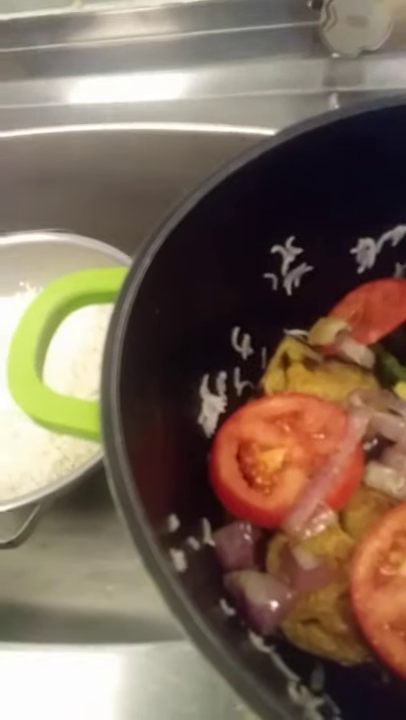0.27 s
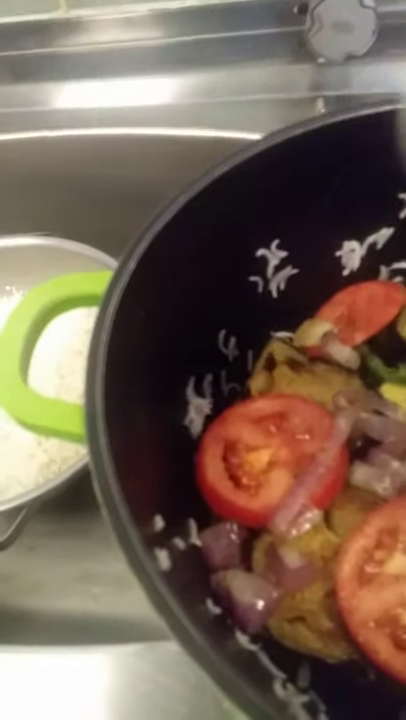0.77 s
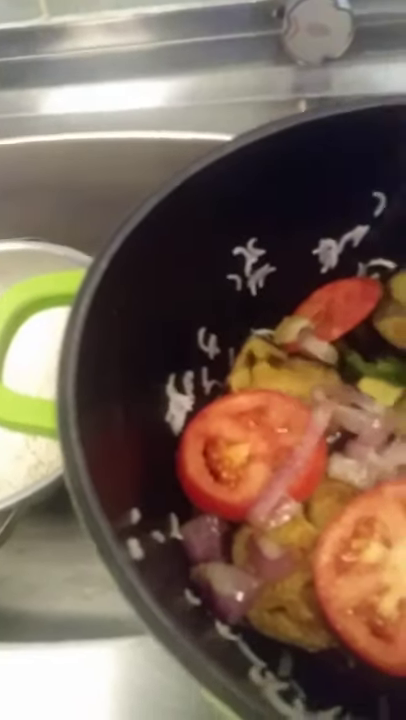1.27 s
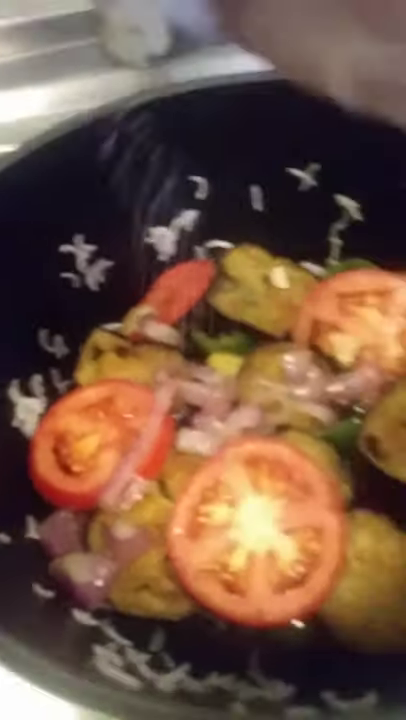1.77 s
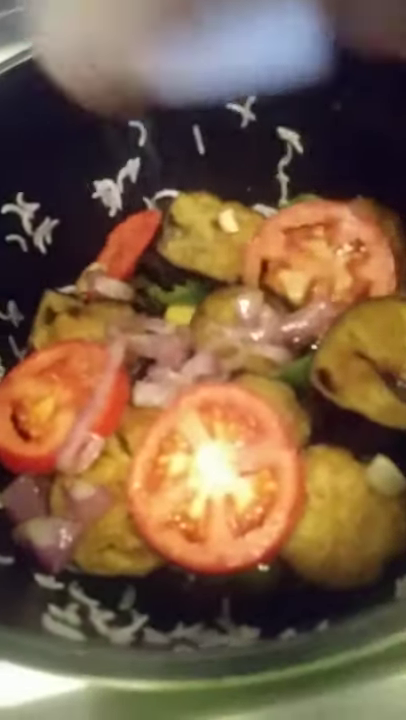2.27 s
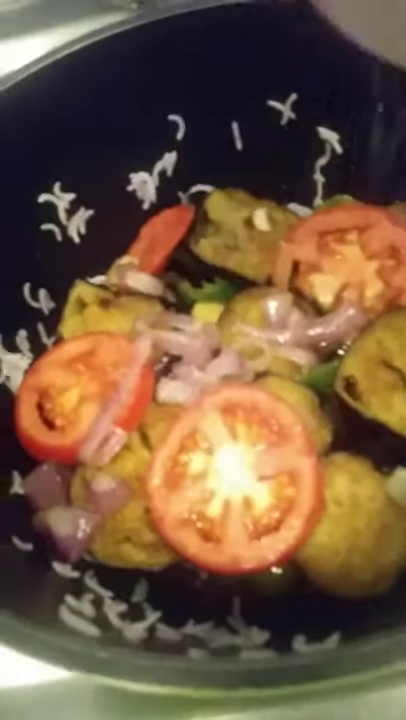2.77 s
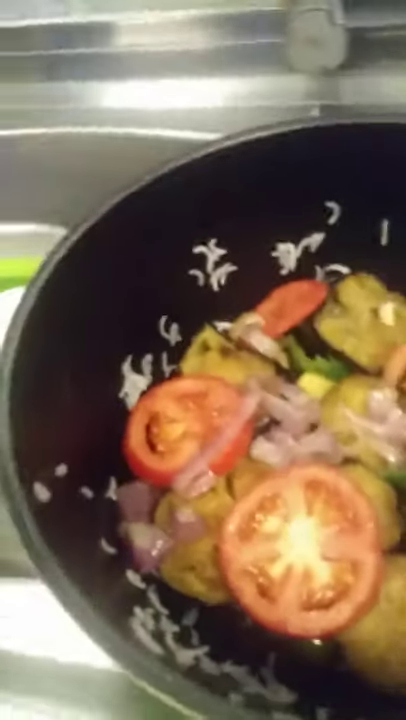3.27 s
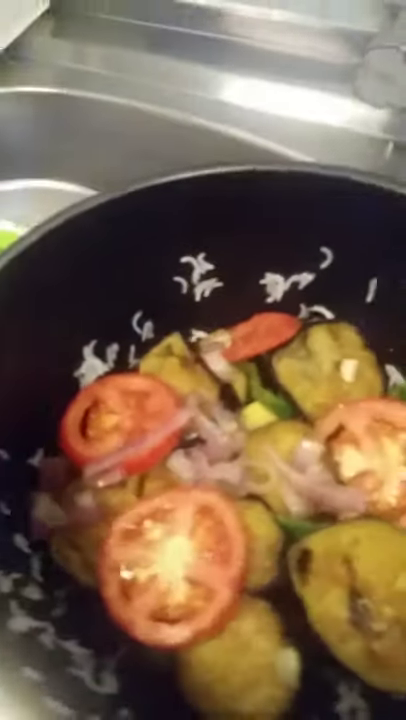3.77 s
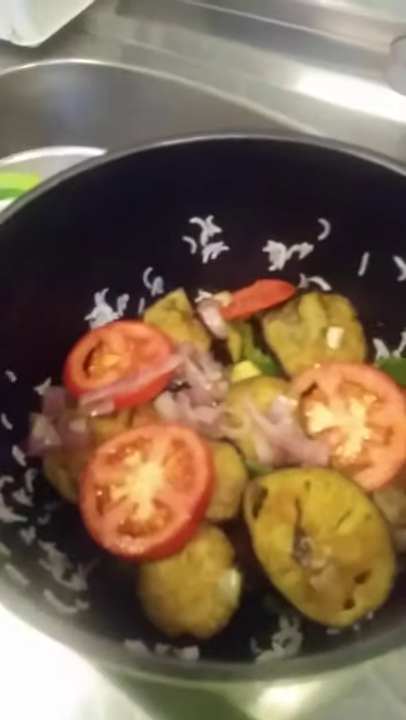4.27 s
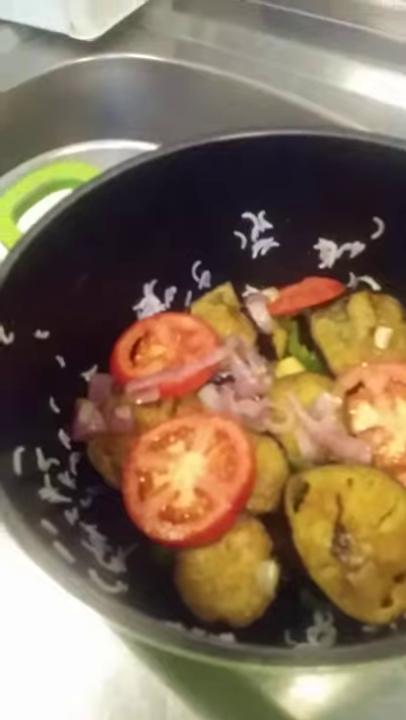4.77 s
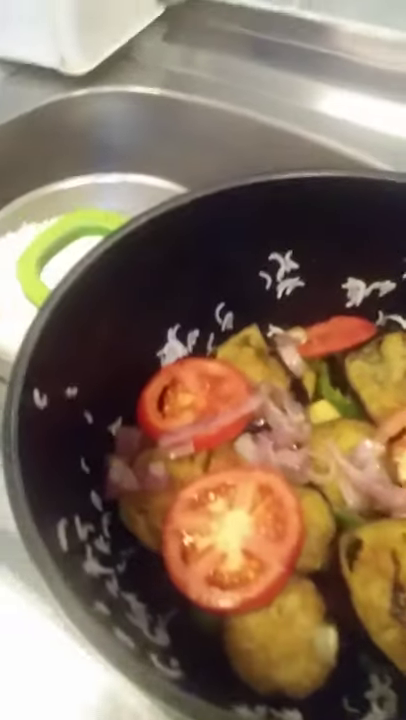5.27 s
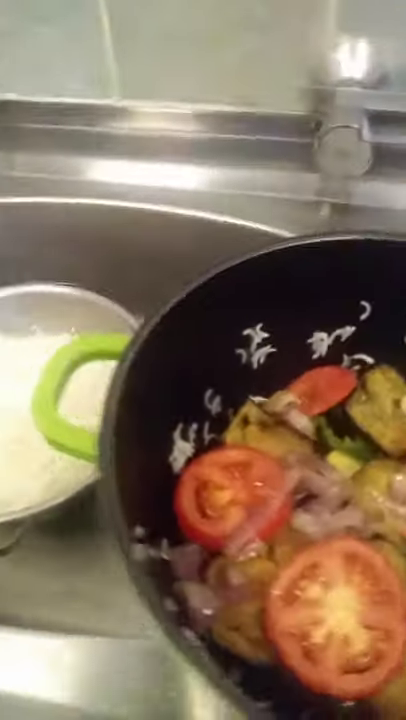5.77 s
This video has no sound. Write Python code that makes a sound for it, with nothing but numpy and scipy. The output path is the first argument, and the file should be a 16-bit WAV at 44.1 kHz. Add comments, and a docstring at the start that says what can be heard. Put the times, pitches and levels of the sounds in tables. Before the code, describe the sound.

Dry salt grains rattle against a shaker cap around five strokes a second, strongest after the first second, with short tiled-room echo and steady phone hiss. After nearly three seconds the shaking ends; tiny clicks and dull bumps remain amid choppy near-silent lulls. Near the end a sudden loud clang with a low thump jangles through the room, over a growing hollow, wavering rush.

```python
"""A salt shaker is shaken about five times a second over a pot of vegetables in a kitchen sink, close to a phone.
Each stroke is a bouncing clump of salt, a swarm of random grains ringing the cap, and a landing tick and hollow pop.
Small knocks (clicks and damped modes) and soft rubs (filtered noise) surround it, over steady hiss and a faint hum.
A hollow rush of resonant noise and wavering tones sets in, then a sudden crash of reflections and metal modes
fills the tiled room and the rush swells. In lulls everything but crash, rush and a faint murk sinks and flutters."""
import sys
import numpy as np
from scipy import signal
from scipy.fft import rfft, irfft
from scipy.io import wavfile
from scipy.ndimage import uniform_filter1d

SR = 44100
rng = np.random.default_rng(int(sys.argv[2]) if len(sys.argv) > 2 else 0)


def transcribe(signal):
    """Save signal, clipped to [-1, 1], as a 16-bit WAV file at the path in sys.argv[1]."""
    frames = np.atleast_2d(signal).T
    limited = np.clip(frames, -1, 1)
    pcm = np.round(limited * 32767).astype(np.int16)
    wavfile.write(sys.argv[1], SR, pcm)


N = 264996
T = np.arange(N) / SR

# colour of salt on the shaker wall: (frequency [Hz], level [dB])
SALT_COLOUR = [(40, -40), (170, -29), (500, -4), (720, -25.5), (950, -26), (1400, -3), (2000, -10),
               (2700, 3.5), (3400, 0.5), (4200, 2.5), (5200, -0.5), (5800, -10.5), (7000, -11), (8000, -30),
               (13000, -41), (16000, -51)]
# colour of the crash: (frequency [Hz], level [dB])
CRASH_COLOUR = [(60, -34), (113, -2), (190, -10.5), (274, -5.5), (529, -5), (834, -3.5), (1120, -8),
                (2170, -9.5), (2800, -4.5), (4300, -3), (8500, -17), (12200, -22.5), (13200, -28),
                (15000, -20.5)]
# how long each band of the crash rings: (frequency [Hz], t60 [s])
CRASH_DECAY = [(100, 0.79), (400, 0.81), (1400, 0.82), (3000, 0.75), (5500, 0.61), (8000, 0.67),
               (12000, 0.32), (16000, 0.42)]
CRASH_LEVEL_S = 0.067  # the wash and jangle of the crash stay at a level this long before they die away
FIRM_DB = -40  # swarm level of a firm stroke


def undb(db):
    """Decibels to gain."""
    return 10 ** (np.asarray(db) / 20)


def unit(x):
    """Scale to rms 1."""
    return x / np.sqrt(np.mean(x ** 2))


def lookup(points, hz):
    """Read a table on a log-frequency axis."""
    f, v = np.transpose(points)
    return np.interp(np.log(hz + 1), np.log(f), v)


def response(points, size=2048):
    """Causal (minimum-phase) impulse response of unit energy with the given colour."""
    freqs = np.arange(size // 2 + 1) * SR / size
    cepstrum = irfft(np.log(undb(lookup(points, freqs))))
    # fold the cepstrum forward in time
    cepstrum[1:size // 2] *= 2
    cepstrum[size // 2 + 1:] = 0
    h = irfft(np.exp(rfft(cepstrum)))
    return h / np.linalg.norm(h)


def through(x, h):
    """Pass a sound through an impulse response."""
    return signal.fftconvolve(x, h)[:len(x)]


def butter(x, order, hz, kind):
    """Butterworth filter, "low" or "high" pass."""
    return signal.sosfilt(signal.butter(order, hz, kind, fs=SR, output="sos"), x)


def decay(size, t60):
    """Exponential fade of 60 dB in t60 seconds."""
    return np.exp(-np.log(1000) * T[:size] / t60)


def level_then_fade(size, level_s, t60):
    """A gain that stays level, then falls 60 dB in t60 seconds."""
    return undb(-60 * np.maximum(T[:size] - level_s, 0) / t60)


def ring(hz, t60, size=8192):
    """One struck mode: a sine that dies away exponentially."""
    return np.sin(2 * np.pi * hz * T[:size]) * decay(size, t60)


def glide(hz):
    """Sine whose frequency follows a curve."""
    return np.sin(2 * np.pi * np.cumsum(hz) / SR)


def resonate(modes):
    """Noise in narrow resonances, rows (frequency [Hz], width [Hz], level [dB])."""
    out = 0
    for hz, width, db in modes:
        t60 = np.log(1000) / np.pi / width
        out = out + undb(db) * unit(through(rng.standard_normal(N), ring(hz, t60, size=16384)))
    return out


def walk(rate):
    """Random wander of rms 1: steps at the given rate [Hz], smoothed twice."""
    k = int(SR / rate)
    steps = np.repeat(rng.standard_normal(N // k + 1), k)
    return unit(uniform_filter1d(uniform_filter1d(steps, k), k)[:N])


def diffuse(band_decay, level_s, size=65536, count=16):
    """Dense reflections: noise that stays level for level_s, then dies in each band at its own rate."""
    noise, out = rfft(rng.standard_normal(size)), 0
    centres = np.geomspace(60, SR / 2, count)
    freqs = np.arange(len(noise)) * SR / size
    for hz, share in zip(centres, np.eye(count)):
        band = irfft(noise * np.interp(freqs, centres, share))
        out = out + band * level_then_fade(size, level_s, lookup(band_decay, hz))
    return out


def add(out, s, x):
    """Mix a sound in at a time."""
    i = int(round(s * SR))
    x, i = x[max(-i, 0):], max(i, 0)
    out[i:i + len(x)] += x[:max(N - i, 0)]


def shaker(low_hz=120):
    """On each stroke a clump hits and bounces, a swarm of grains rattles and the bulk lands with a tick and a pop."""
    # strokes: (first clump [s], its peak [dB], delay of the swarm [s], swarm level [dB],
    #           pop level before its soft onset [dB])
    strokes = [(.005, -31, .016, -44, -48), (.1905, -43, .021, -49, -45), (.3643, -39, .021, -49.5, -56),
               (.5601, -41, .033, -46.5, -48), (.7736, -34, .015, -38.5, -42),
               (.9342, -24.5, .025, -34.5, -35.5), (1.1461, -25.5, .024, -34.5, -36),
               (1.337, -30.5, .033, -38, -36), (1.54, -23, .003, -42, -37), (1.7344, -36, .03, -48, -56),
               (1.957, -46, .032, -47.5, -56), (2.181, -45, .019, -46, -53), (2.37, -42, .012, -49, -54),
               (2.5945, -33.5, .014, -45, -43), (2.7606, -34, .023, -40, -42)]
    bounce_s, bounce_db = .0085, -3
    pop_lead_s = .002  # the pop starts just ahead of the landing tick
    tick_db, tick_growth = -31, 1.5  # peak on a firm stroke; dB per dB of extra force
    out = np.zeros(N)
    for s, clump_db, delay, swarm_db, pop_db in strokes:
        landing_s = s + delay
        add(out, s, clump(clump_db))
        add(out, s + bounce_s, clump(clump_db + bounce_db))
        add(out, *swarm(landing_s, swarm_db))
        add(out, landing_s, clump(tick_db + tick_growth * (swarm_db - FIRM_DB)))
        add(out, landing_s - pop_lead_s, pop(pop_db))
    return butter(out, 1, low_hz, "high")


def clump(db, t60=.015, size=12000):
    """A clump of salt ticks against the cap: a short noise burst that rings it."""
    push = rng.standard_normal(size) * decay(size, t60)
    tick = cap(push, low_db=-15.5, high_db=0, high_hz=4590, body_db=-18.5)
    return undb(db) * tick / abs(tick).max()


def swarm(s, db, grain_rate=2400, grain_spread_db=3.0, rise=1.38, fall=1.27, size=12000):
    """Loose grains thicken towards a moment and thin out again about as quickly: (start time, sound)."""
    t = T[:size] - T[size // 2]
    half = max(.02 + .0007 * (FIRM_DB - db), .005)  # seconds; softer strokes spread out
    flow = 1 / np.cosh(np.where(t < 0, rise, fall) * t / half)
    # sparse impacts of random sign and size
    grains = (rng.random(size) < grain_rate / SR) * rng.choice([-1, 1], size)
    grains = grains * undb(grain_spread_db * np.minimum(rng.exponential(size=size), 4))
    force_db = db - FIRM_DB
    body_db = -13.5 + 1.3 * force_db  # harder strokes ring the body of the cap
    high_db = -3 + .45 * force_db  # and bring out its high ring
    # later swarms ring the cap higher, and its low mode more freely
    low_db = -11 + 4.5 * s
    high_hz = 4520 + 190 * s
    rattle = cap(grains * flow, low_db, high_db, high_hz, body_db)
    return s + t[0], undb(db) * unit(rattle) * np.sqrt(np.mean(flow ** 2))


def cap(push, low_db, high_db, high_hz, body_db, patchy_db=4.0, count=40):
    """Impacts ring the shaker wall, a little differently as the salt shifts, and three modes of its cap."""
    freqs = np.geomspace(150, 16000, count)
    patchy = lookup(SALT_COLOUR, freqs) + patchy_db * rng.standard_normal(count)
    out = unit(through(push, response(np.column_stack([freqs, patchy]))))
    scattered_hz = high_hz * (1 + .02 * rng.standard_normal())  # wanders from hit to hit
    for hz, t60, db in [(1400, .014, body_db), (2760, .016, low_db), (scattered_hz, .016, high_db)]:
        out = out + undb(db) * unit(through(push, ring(hz, t60)))
    return out


def pop(db, t60=.063, size=12000):
    """The bulk of the salt lands and pops the air inside: a short damped tone."""
    scatter = 1 + .02 * rng.standard_normal()
    sinking = 0.917 + 0.14 * np.exp(-T[:size] / 0.0087)  # as the salt settles
    tone = glide(505 * scatter * sinking) * decay(size, t60)
    return undb(db) * tone * (1 - np.exp(-T[:size] / 0.0029))


def knocks(scatter_db=-20, scatter_t60=0.03):
    """A click, a little scatter off the sink and one damped mode for each touch; soft contacts lose their treble."""
    # small knocks of handling: (time [s], mode level at onset [dB], pitch [Hz], t60 [s],
    #                            click level before its treble cut [dB], click top [Hz])
    touches = [(.489, -44, 1000, .009, -30, 4000), (2.714, -38, 890, .006, -37.5, 4000),
               (3.205, -40.5, 212, .024, -54, 3000), (3.661, -37, 545, .007, -41, 1530),
               (3.696, -51, 600, .0065, -34, 6950), (4.1049, -38.5, 4170, .016, -33, 6040),
               (4.108, -49, 3600, .03, -37, 5000), (4.7397, -23.5, 203, .011, -52, 3980),
               (4.7493, -40, 400, .0014, -24, 15000), (5.597, -56, 444, .041, -41, 4500),
               (5.988, -31.5, 560, .018, -23.5, 9100), (5.992, -30.5, 572, .037, -36, 5000)]
    # colour of a click: (frequency [Hz], level [dB])
    click_colour = [(100, -13), (1000, -3.5), (4500, -2), (7000, -11), (9000, -16), (16000, -35)]
    out, click = np.zeros(N), response(click_colour)
    for s, db, hz, t60, click_db, top_hz in touches:
        scatter = rng.standard_normal(len(click)) * decay(len(click), scatter_t60)
        snap = click / abs(click).max() + undb(scatter_db) * through(scatter, response(SALT_COLOUR))
        add(out, s, undb(db) * ring(hz, t60))
        add(out, s, undb(click_db) * butter(snap, 3, top_hz, "low"))
    return out


def rustle(tone_db=-4, tone_t60=.08):
    """Soft rubs as the hand moves over the pot: dull noise with one hollow resonance."""
    # rubs: (time [s], half length [s], level of the dull noise [dB], hollow tone [Hz])
    rubs = [(0.913, 0.014, -64, 785), (1.796, 0.069, -56, 743), (1.985, 0.056, -55, 757)]
    colour = [(60, -9), (130, 2.5), (320, -3), (550, -7), (750, -1.5), (900, -13), (3000, -36)]
    dull = through(rng.standard_normal(N), response(colour))
    out = 0
    for s, half, db, hz in rubs:
        hollow = undb(tone_db) * unit(through(rng.standard_normal(N), ring(hz, tone_t60)))
        out = out + undb(db) * (dull + hollow) * np.exp(-((T - s) / half) ** 2)
    return out


def crash(noise_db=-25.5, jangle_db=-30.5, ring_db=-30.5, boom_db=-33.5, thump_db=-25, clatter_db=1.2, low_hz=80):
    """A hard blow heard mostly by its uneven reflections, with ringing modes, a thump and a beating boom."""
    # ringing modes: (frequency [Hz], level relative to ring_db [dB], t60 [s])
    ringing = [(135, -10, 0.73), (1421, -10, 0.73), (1814, -4, 0.57), (2406, -8, 0.68), (2794, -7, 0.82),
               (3160, -6, 0.61), (3418, -3, 0.53), (3499, 0, 0.82), (3833, 0, 0.43), (4317, -4, 0.64),
               (4500, -9, 0.87), (4807, -13, 1.1), (4985, -7, 0.54), (5739, -11, 0.53), (6051, -8, 0.49),
               (6627, -12, 0.53), (7359, -9, 0.46), (8344, -18, 0.54), (9442, -20, 0.69), (9733, -15, 0.37),
               (10010, -26, 0.94), (10260, -9, 0.24), (10460, -18, 0.44), (11650, -15, 0.36)]
    out = np.zeros(N)
    wash = undb(noise_db) * through(diffuse(CRASH_DECAY, CRASH_LEVEL_S), response(CRASH_COLOUR))
    size = len(wash)
    wash = wash * undb(clatter_db * walk(250.3)[:size])
    metal = undb(jangle_db) * jangle(size)
    rings = sum(rng.choice([-1, 1]) * undb(db + ring_db) * ring(hz, t60, size) for hz, db, t60 in ringing)
    boom = undb(boom_db) * (ring(108.3, 0.4, size) - ring(116, 0.16, size))
    thump = undb(thump_db) * ring(264, .05, size)
    onset = 1 - np.exp(-T[:size] / 0.001)
    add(out, 4.9305, (wash + metal + rings + boom + thump) * onset)
    return butter(out, 4, low_hz, "high")


def jangle(size, count=220, spread_db=4):
    """The many weak, close modes of thin metal, each dying at about the rate of its band."""
    out = 0
    for place, loud, life, phase in rng.random((count, 4)):
        hz = 1200 * 10 ** place
        t60 = lookup(CRASH_DECAY, hz) * (0.92 + 0.52 * life)
        gain = undb(lookup(CRASH_COLOUR, hz) - spread_db * np.log(1 - .95 * loud)) * np.sqrt(hz)
        tone = np.sin(2 * np.pi * (hz * T[:size] + phase))
        out = out + gain * tone * level_then_fade(size, CRASH_LEVEL_S, t60)
    return out / np.std(out[:int(CRASH_LEVEL_S * SR)])


def rush(hollow_db=-1, flutter_db=1.4, tone_db=1, tone_fade_db_per_s=4.5, tone_rise_s=.7):
    """A hollow, uneven rush that sets in and later swells, over three wavering tones that build and slowly fade."""
    # colour of the rushing noise: (frequency [Hz], level [dB])
    air_colour = [(50, -22.5), (110, 0), (400, 4), (1000, -9.5), (1450, 4), (2000, -3.5), (3200, -2.5),
                  (4500, -6.5), (6500, -12), (8500, -33.5), (16000, -40)]
    # its resonances: (frequency [Hz], width [Hz], level relative to hollow_db [dB])
    hollows = [(192, 14, -6), (799, 18, -7.5), (1394, 160, -5.5)]
    # hollow tones under it: (frequency [Hz], spread of its wander [Hz], level before tone_db [dB])
    drones = [(434, 5, -60.5), (504, 12.2, -68.5), (1420, 22, -65)]
    start_s, start_db, swell_start_s, swell_db_per_s = 4.6, -62, 4.95, 9.5
    age, swell_s = np.maximum(T - start_s, 0), np.maximum(T - swell_start_s, 0)
    air = through(rng.standard_normal(N), response(air_colour)) + undb(hollow_db) * resonate(hollows)
    air = butter(air, 2, 80, "high")
    level_db = start_db + swell_db_per_s * swell_s + flutter_db * walk(40)
    tones = 0
    for hz, width, db in drones:
        wavering = np.sqrt(2) * glide(hz + width * walk(30))
        tones = tones + undb(db + 2.0 * walk(13)) * wavering
    tone_gain = undb(tone_db - tone_fade_db_per_s * swell_s) * np.minimum(age / tone_rise_s, 1)
    return air * undb(level_db) * (age > 0) + tones * tone_gain


def background(hiss_db=-56.8, hum_db=-72, drift_db=.5):
    """Steady kitchen hiss (coloured noise) that drifts a little, over a faint low hum (a sine)."""
    # colour of the hiss: (frequency [Hz], level [dB])
    hiss_colour = [(18, -41), (30, -14), (109, 2), (287, -0.5), (473, -1), (600, -3.5), (866, -6.5),
                   (1100, -6.5), (2230, -6.5), (4190, -2.5), (5040, -7), (8080, -25.5), (13000, -27),
                   (14800, -24.5), (16000, -29)]
    hiss = through(rng.standard_normal(N), response(hiss_colour, size=8192))
    level_db = hiss_db + drift_db * walk(4) + .5 * walk(40)
    return undb(level_db) * hiss + undb(hum_db) * np.sin(2 * np.pi * 100 * T)


def murk(murk_db=-88):
    """The faint dull noise that stays even in the lulls."""
    colour = [(40, -13), (110, 2), (220, -5.5), (330, 5), (600, -11.5), (4000, -18), (16000, -25.5)]
    return undb(murk_db) * through(rng.standard_normal(N), response(colour))


def lulls(sink_s=0.028, flutter=0.12, flicker_fall_db=12):
    """Gain that sinks in each lull, flutters while it is down and now and then flickers part of the way back."""
    # lulls: (start of full depth [s], end [s], depth before flutter [dB], recovery [s])
    low_spells = [(.157, .159, -14, .021), (.3, .348, -7, .022), (.538, .538, -20, .012),
                  (.705, .735, -16, .026), (1.886, 1.909, -17, .035), (2.14, 2.146, -8, .016),
                  (2.324, 2.329, -25, .026), (2.512, 2.522, -19, .041), (3.345, 3.91, -27, .05),
                  (4.248, 4.597, -24, .0043)]
    # flickers in the long lulls: (time [s], half length [s], peak before flutter [dB])
    returns = [(3.335, .035, -12), (3.555, .015, -16), (3.695, .044, -1.5), (3.845, .02, -7.5),
               (3.908, .025, -8.5), (4.31, .022, -14), (4.382, .048, -4.5), (4.475, .012, -15),
               (4.502, .01, -16)]
    dips = [np.interp(T, [a - sink_s, a, b, b + back], [0, depth, depth, 0]) for a, b, depth, back in low_spells]
    flickers = [db - flicker_fall_db * ((T - s) / half) ** 2 for s, half, db in returns]
    level_db = np.maximum(np.min(dips, axis=0), np.max(flickers, axis=0))
    return undb(level_db * (1 + flutter * walk(45)))


def scene(room_db=-11):
    """Close shaker and its echo off the tiles, with all other sounds, the same in both channels."""
    # reverberation of the kitchen: (frequency [Hz], t60 [s])
    room_decay = [(200, 0.36), (3000, 0.46), (8000, 0.51), (16000, 0.11)]
    close, room = shaker(), diffuse(room_decay, 0)
    echo = undb(room_db) * through(close, room / np.linalg.norm(room))
    sinking = (close + echo + knocks() + rustle() + background()) * lulls()
    mono = sinking + crash() + rush() + murk()
    return np.array([mono, mono])


def record(dry):
    """The phone thins the deep bass and cuts the top."""
    thin = butter(dry, 2, 55, "high")
    return signal.sosfilt(signal.ellip(10, .2, 80, 15900, fs=SR, output="sos"), thin)


dry = scene()
out = record(dry)
transcribe(out)
```